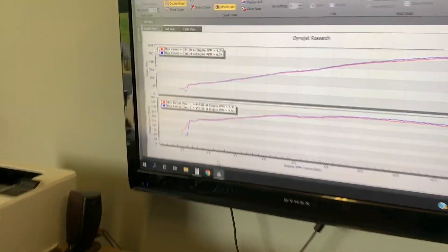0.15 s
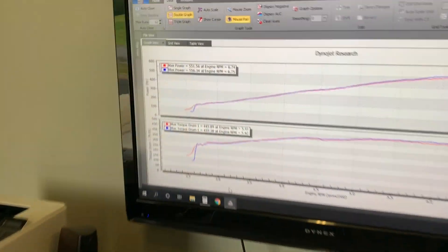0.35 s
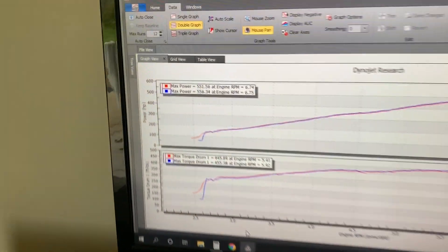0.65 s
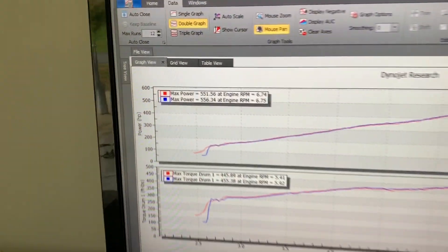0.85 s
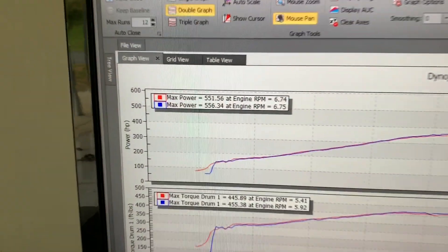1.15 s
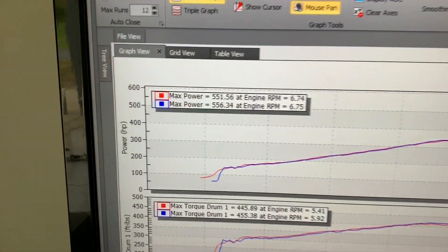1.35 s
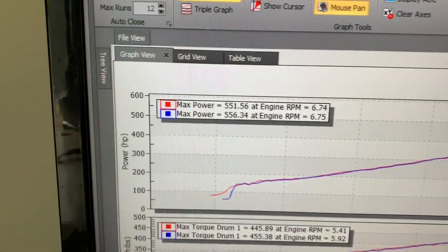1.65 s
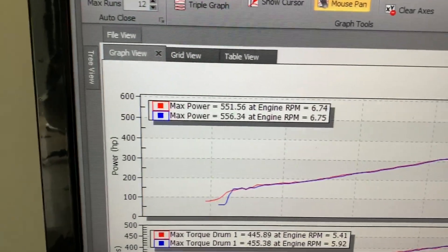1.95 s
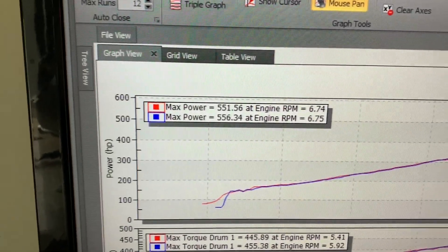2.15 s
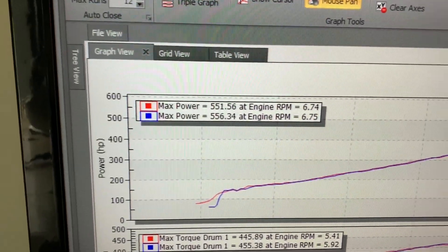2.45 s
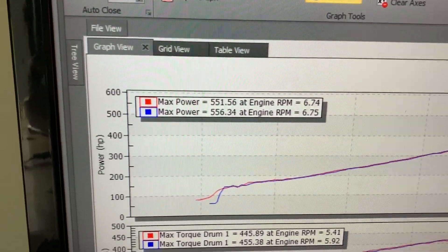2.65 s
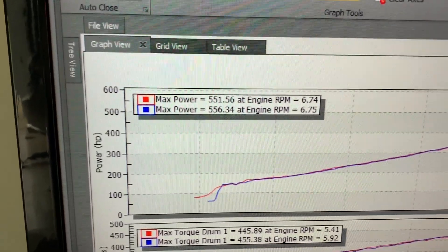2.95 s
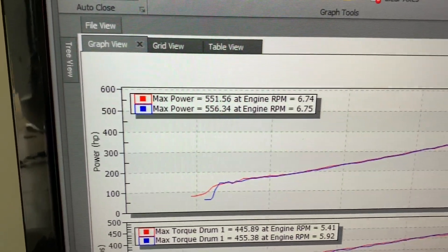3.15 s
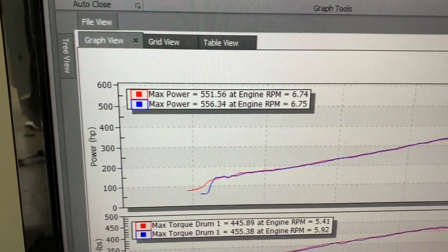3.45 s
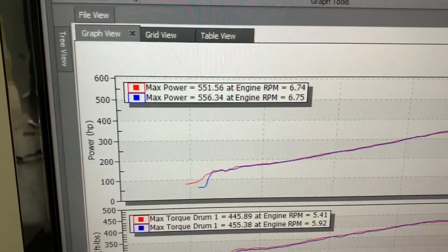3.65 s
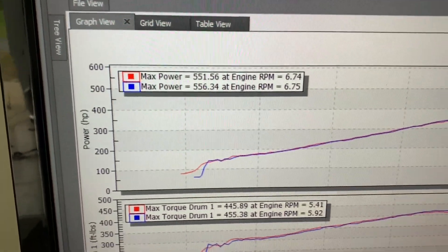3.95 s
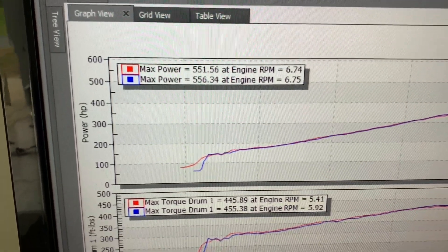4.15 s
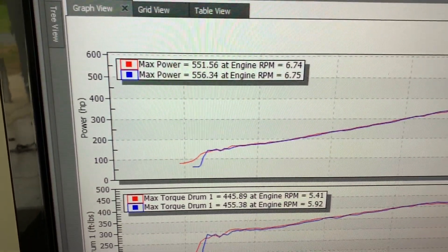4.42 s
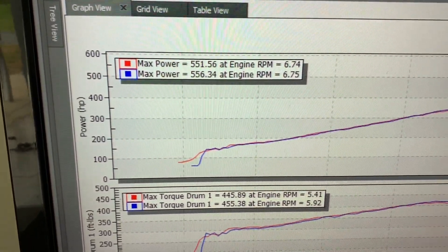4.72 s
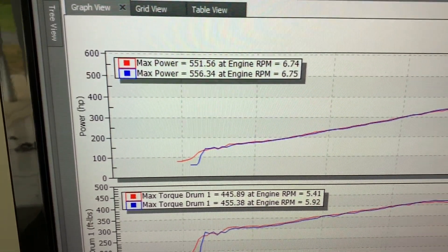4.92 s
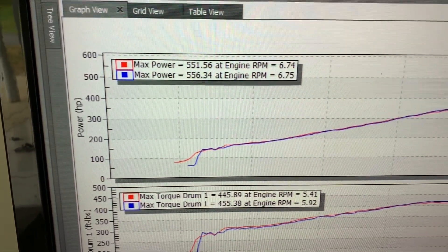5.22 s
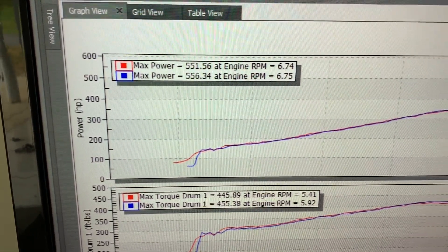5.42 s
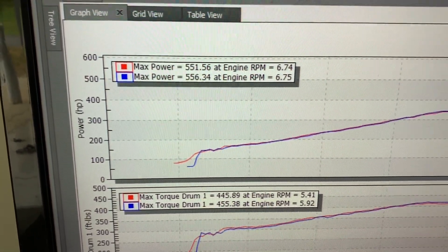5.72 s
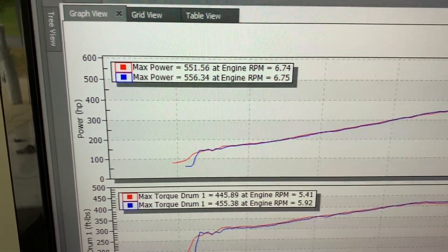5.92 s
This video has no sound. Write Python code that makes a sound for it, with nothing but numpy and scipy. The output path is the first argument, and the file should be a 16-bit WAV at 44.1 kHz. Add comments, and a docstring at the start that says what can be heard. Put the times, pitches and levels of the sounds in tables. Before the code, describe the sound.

Lumpy rasping exhaust idle grows stronger over tyre roar and a falling, fluttering whine as a rolling-road drum slows in a reverberant workshop.

```python
"""A lumpy, throbbing, rasping exhaust: a supercharged V8 idles while its wheels coast down on a dyno drum.
Firing tones, throbs and noisy puffs ring the pipes and the room; rotor whirr and valve taps lie over them.
The tyre tread hums, the axle gears and the knurled drum whine: tones and noises tied to the wheel's angle,
all sinking in pitch as the drum slows. Shaped noise makes the roar of the rolling tyres in the workshop."""
import sys
import numpy as np
from scipy import signal
from scipy.fft import rfft, irfft, next_fast_len
from scipy.io import wavfile
from scipy.ndimage import map_coordinates

SR = 44100
rng = np.random.default_rng(int(sys.argv[2]) if len(sys.argv) > 2 else 0)


def put_to_file(sound):
    """Save the sound as 16-bit audio at rate SR, in the file named by the first command-line argument."""
    columns = np.atleast_2d(sound).T  # one column per channel
    safe = np.clip(columns, -1, 1)
    whole_steps = np.round(safe * 32767)
    wavfile.write(sys.argv[1], SR, whole_steps.astype(np.int16))


N = 268128
TIME = np.arange(N) / SR
# the idle lopes: one pattern of throbs comes round every two engine cycles
LOPE_FIRINGS = 16
MAIN_THROB = 1.3  # place of the main throb in the pattern (firings)


def amp(db):
    """Decibels to gain."""
    return 10 ** (np.asarray(db) / 20)


def unit(x):
    """Scale to rms 1."""
    return x / np.sqrt(np.mean(x ** 2) + 1e-20)


def along(points, at):
    """Read (position, value) points on a log axis."""
    place, value = np.transpose(points)
    return np.interp(np.log(at + 1e-6), np.log(place), value)


def curves(rows):
    """One value per sample for each column after the time."""
    s, *cols = np.transpose(rows)
    return [np.interp(TIME, s, c) for c in cols]


def wobble(rate):
    """A smooth random curve, rate knots a second."""
    coarse = TIME[::32]
    knots = rng.standard_normal(int(N * rate / SR) + 4)
    return np.interp(TIME, coarse, map_coordinates(knots, [coarse * rate]))


def wavering_sine(cycles, waver, rate):
    """A sine along a count of cycles, its phase pushed about by a random curve (radians, knots a second)."""
    return np.sin(2 * np.pi * cycles + waver * wobble(rate))


def filtered(x, response):
    """Filter x by a complex response of frequency."""
    m = next_fast_len(N + SR // 2)
    return irfft(rfft(x, m) * response(np.fft.rfftfreq(m, 1 / SR)), m)[..., :N]


def resonances(modes, f):
    """Causal response of (centre, width, dB) modes, one row each."""
    return np.array([amp(db) * 1j * f * w / (c * c - f * f + 1j * f * w) for c, w, db in modes])


def rotating(turns, gain_by_order, size=4096):
    """Two noises tied to the wheel's angle, so that their spectrum slides with its speed."""
    m = next_fast_len(int((turns[-1] + 1) * size))  # size: points per wheel turn
    spectrum = rfft(rng.standard_normal((2, m))) * gain_by_order(np.fft.rfftfreq(m, 1 / size))
    return np.array([map_coordinates(wave, [turns * size]) for wave in irfft(spectrum, m)])


def spread(pair):
    """Two unrelated sounds become left and right, alike in the bass and the top treble."""
    # left-right likeness: (frequency [Hz], coherence [0-1])
    alike = [(60, 0.96), (130, 0.97), (250, 0.21), (500, 0.43), (1200, 0.28), (4000, 0.095), (6000, 0.1),
             (7500, 1), (15000, 1)]

    def mid_and_side(hz):
        turn = np.arccos(np.clip(along(alike, hz), -1, 1)) / 2
        return np.array([np.cos(turn), np.sin(turn)])

    mid, side = filtered(pair, mid_and_side)
    return unit(np.array([mid + side, mid - side]))


def workshop(pair):
    """The room's resonances swell whatever passes through them."""
    # pitches the workshop lifts: (centre [Hz], width [Hz], gain [dB])
    shop = [(485, 55, -7.5), (782, 25, -10), (897, 26, -9), (1000, 105, -8.5), (1440, 110, -14)]
    return spread(filtered(pair, lambda hz: 1 + resonances(shop, hz).sum(0)))


def echoes(pair, t60=0.93, wet_db=0):
    """Direct sound plus the hard walls' answer: a gliding line swells and fades as it crosses room modes."""
    t = np.arange(SR // 2) / SR
    tail = rng.standard_normal((2, len(t))) * amp(-60 * t / t60)
    tail /= np.linalg.norm(tail, axis=1, keepdims=True)
    # a mirrored lead-in lets the room ring from the first sample
    lead = np.pad(pair, ((0, 0), (len(t), 0)), mode="reflect")
    reverb = signal.fftconvolve(lead, tail, axes=1)[:, len(t):len(t) + N]
    return pair + amp(wet_db) * reverb


def patchy(pair, depth_db, width_hz=45, length_s=0.05):
    """Narrow strands of a noise swell and fade, each on its own, less so in the treble."""
    hz, t, z = signal.stft(pair, SR, nperseg=2048)
    knots = rng.standard_normal((2048, 512))
    place = np.meshgrid(hz / width_hz, t / length_s, indexing="ij")
    field = map_coordinates(knots, place, order=1, mode="wrap")
    fade = 1 / (1 + (hz / 4000) ** 2)
    gain = amp(depth_db * unit(field) * fade[:, None])
    return signal.istft(z * gain, SR, nperseg=2048)[1][:, :N]


def rolling_roar(strands_db=2.5):
    """The roar of tyres and fans is noise with swelling strands, coloured by the workshop."""
    # colour of the roar: (frequency [Hz], relative level per Hz [dB])
    colour = [(25, -40), (60, -1), (250, 2.5), (400, -5.5), (520, -2), (1100, -4.5), (1800, -3.5),
              (2800, -4.5), (4500, -9), (6300, -13.5), (9500, -9), (13000, -12.5), (15500, -19)]
    noise = patchy(rng.standard_normal((2, N)), strands_db)
    return workshop(filtered(noise, lambda hz: amp(along(colour, hz))))


def drum_hum(turns, start_db=-48, fall_db=1.5):
    """The slightly oval drum thrums in step with the wheel, sinking by fall_db a second on average."""
    hums_per_wheel_turn = 2.251
    level = amp(start_db - fall_db * TIME + 3.2 * wobble(4.17))
    hum = level * np.sqrt(2) * np.sin(2 * np.pi * hums_per_wheel_turn * turns)
    return hum * np.clip(TIME / 0.068, 0, 1)  # short fade-in


def axle_gears(turns, flutter_db=4.5, waver=0.83):
    """The axle's teeth mesh in a thin whine that comes and goes, strongest late in the coast."""
    meshes_per_turn, swell_db = 114, 1.5
    # loudness of the gear whine: (time [s], level before flutter [dB])
    gear_level = [(0, -60), (1.1, -57), (1.6, -56), (2.35, -55), (2.7, -54), (3.05, -56.5), (3.3, -53.5),
                  (3.9, -51), (4.6, -57), (4.85, -52), (5.05, -56.5), (5.5, -51.5), (6.08, -55)]
    level_db = curves(gear_level)[0] + swell_db * wobble(9)

    def ear():
        return amp(level_db + flutter_db * wobble(35)) * wavering_sine(meshes_per_turn * turns, waver, 40)

    return np.array([ear(), ear()]) * np.sqrt(2)


def whine(turns, fuzz_db=-2):
    """The knurl rubs narrow bands of hiss out of the tyres."""
    # fuzzy sidebands and hiss: (centre [wheel orders], width [wheel orders], relative level [dB])
    hiss_bands = [(143, 3, 1.5), (229, 9, -7), (242, 4, -5.5), (259, 12, -5), (282, 5, -.5), (304, 9, -10),
                  (508, 16, -8), (524, 6, -6.5), (541.5, 11, -3.5), (563, 7, 4), (586, 9, -5),
                  (553, 130, -10), (803, 12, -14), (823, 9, -14), (845.5, 11, -7.5)]

    def band(away):
        return np.exp(-np.abs(away) / 0.47) / (1 + (2 * away) ** 2)

    def gain(order):
        power = sum(amp(db) ** 2 * band((order - centre) / width) for centre, width, db in hiss_bands)
        return np.sqrt(power)

    return amp(fuzz_db) * spread(rotating(turns, gain))


def teeth(turns, waver=0.58, fade_db=4.0):
    """The knurl's ridges sing in lines that flutter as the tyres creep on the drum, and fade in and out."""
    knurl_order = 281.5  # ridges that pass in one wheel turn
    # line of the knurl, then its octave: (relative level [dB], flutter [dB])
    tones = [(-17, 5.5), (-16.5, 5.5)]

    def line(order, flutter_db):
        level = amp(flutter_db * wobble(55) + fade_db * wobble(11))
        return unit(level * wavering_sine(order * turns, waver, 70))

    def ear():
        return sum(amp(db) * line(k * knurl_order, flutter_db) for k, (db, flutter_db) in enumerate(tones, 1))

    pair = np.array([ear(), ear()])
    return pair.std() * spread(pair)


def tread_note(turns, flutter_db=4.5, waver=0.81):
    """The commonest block length of the tread sings one wavering note that sinks with the wheel."""
    blocks_per_turn = 39.1
    # the note comes and goes: (time [s], level before flutter [dB])
    note_level = [(0, -46), (.45, -47), (.8, -52), (1.25, -49), (2, -46), (2.25, -55), (2.55, -51),
                  (3, -56), (3.75, -49), (4.3, -62), (6.08, -64)]
    level_db, = curves(note_level)
    level = amp(level_db + flutter_db * wobble(22.1))
    return np.sqrt(2) * level * wavering_sine(blocks_per_turn * turns, waver, 28)


def tread(turns, scatter_db=1.8, blur_from_s=3.46, blur_over_s=1.3, blur_share=0.41):
    """The tread pattern repeats every turn: a comb of wheel orders that later blurs partly into a rumble."""
    line_width = .18  # sets how narrow the comb lines are
    # blocks of mixed lengths spread the hum: (wheel order, relative level [dB])
    hum_shape = [(12, -17), (20, -9.5), (30, -4.5), (35.5, -8), (39.3, 5.5), (45, -3), (48.5, 0), (57, 1.5),
                 (62, -2), (67, -10.5), (79, 3.5), (92, -6), (101, 0), (107, -8.5), (122, -7), (143, -8.5),
                 (200, -10), (300, -22)]
    # comb lines of set strength, the others are random: (wheel order, line gain [dB])
    peaks = [(39, -3), (40, 0), (41, 1), (43, 3), (48, 3), (49, 4), (52, 4), (54, 3), (57, 2), (78, 3),
             (82, 2), (86, 4), (99, 4), (110, 3)]
    strength_db = scatter_db * rng.standard_normal(2049)
    for order, db in peaks:
        strength_db[round(order)] = db

    def shape(order):
        return amp(along(hum_shape, order))

    def comb(order):
        strength = amp(strength_db)[np.rint(order).astype(int)]
        return strength / (1 + (np.sin(np.pi * order) / line_width) ** 2)

    lines = unit(rotating(turns, lambda order: shape(order) * comb(order)))
    rumble = unit(rotating(turns, shape, size=1024))
    blur = blur_share * np.clip((TIME - blur_from_s) / blur_over_s, 0, 1)
    return workshop(np.sqrt(1 - blur) * echoes(lines) + np.sqrt(blur) * rumble)


def dyno(turns):
    """Wheels and drum roll together: roar, tread hum, whine and drum thrum."""
    # rolling loudness: (time [s], roar level [dB], tread hum level [dB], whine gain [dB])
    rolling_levels = [(0, -43, -39.5, -47.5), (1, -41, -40, -44.5), (2, -43, -39, -42.5),
                      (3, -41.5, -39, -42.5), (4, -39.5, -38.5, -41), (5, -38.5, -38, -41),
                      (6.08, -37, -38, -40)]
    roar_db, tread_db, whine_db = curves(rolling_levels)
    roar = amp(roar_db) * rolling_roar()
    hum = amp(tread_db) * tread(turns) + tread_note(turns)
    singing = amp(whine_db + 0.77 * wobble(9)) * (whine(turns) + teeth(turns))
    return roar + hum + singing + drum_hum(turns)


def valve_clatter(cycles, clatter_db=-50, centre_hz=1750, width_hz=900, uneven_db=3.0, decay=4.7):
    """Valves tap twice a firing; each tap is a short rattle of uneven strength."""
    tap, since = np.divmod(2 * cycles, 1)
    size = amp(uneven_db * rng.standard_normal(int(tap[-1]) + 1))[tap.astype(int)]
    taps = size * np.exp(-decay * since) * rng.standard_normal((2, N))
    mode = [(centre_hz, width_hz, 0)]
    return amp(clatter_db) * unit(filtered(taps, lambda hz: resonances(mode, hz)[0] ** 2))


def supercharger(cycles, decay=1.03):
    """The belt-driven rotors whirr in rough lines that follow the engine speed and rattle at each firing."""
    waver, flutter_db = 1.1, 3.5
    # lines of the whirr: (multiple of the firing rate, relative level [dB])
    rotor_lines = [(20.2, 2.5), (25, 1.5), (26.4, -0.5)]
    # the whirr fades as the engine settles: (time [s], level [dB])
    whirr_level = [(0, -48), (.8, -46), (1.6, -57.5), (6.08, -64)]
    level_db, = curves(whirr_level)
    rattle = np.exp(-decay * (cycles % 1))

    def line(order):
        return unit(rattle * amp(flutter_db * wobble(70)) * wavering_sine(order * cycles, waver, 70))

    def ear():
        return sum(amp(db) * line(order) for order, db in rotor_lines)

    return amp(level_db) * spread(np.array([ear(), ear()]))


def settling_drone(drone_hz=171, drone_db=-44, fade_s=1.0):
    """A wavering drone that dies away as the engine settles to idle."""
    level = amp(drone_db + 1.6 * wobble(7.24)) * np.exp(-(TIME / fade_s) ** 4)
    return level * np.sqrt(2) * wavering_sine(drone_hz * TIME, 0.93, 13.5)


def pipe_drone(cycles, flutter_db=1.5, waver=0.4):
    """The uneven firing of each bank sets a pipe droning between two harmonics."""
    order = 3.5  # multiple of the firing rate
    # loudness of the drone: (time [s], level before flutter [dB])
    drone_level = [(0, -54), (.6, -59), (1, -46.5), (1.3, -55.5), (2, -60), (2.3, -55), (3, -57.5),
                   (3.33, -47.5), (3.55, -61), (4.2, -52.5), (5.6, -51.5), (5.72, -40.5), (5.87, -42),
                   (6.08, -57)]
    level_db, = curves(drone_level)
    level = amp(level_db + flutter_db * wobble(16))
    return np.sqrt(2) * level * wavering_sine(order * cycles, waver, 14)


def throbs(cycles, join_s=0.41, scatter_db=1.0):
    """(s, dB) of every throb: the main one once in each round of the lope, lesser ones join in by and by."""
    # the lope builds up, then evens out: (time [s], main throb level before scatter [dB])
    lope = [(.3, -40), (1.2, -31.5), (2.3, -26.5), (3.95, -21.5), (4.4, -24), (6.08, -31)]
    # throbs that fill the pattern: (place [firings], level before scatter [dB], joins in at [s])
    lesser_throbs = [(4.5, -26, 3.15), (9, -28, 3.36), (13.9, -29, 1.74)]
    rounds = np.arange(0, cycles[-1], LOPE_FIRINGS)

    def times(place):
        firings = rounds + place
        return np.interp(firings[firings < cycles[-1]], cycles, TIME)

    both = [(s, np.interp(s, *np.transpose(lope))) for s in times(MAIN_THROB)]
    for place, db, joins in lesser_throbs:
        both += [(s, db - 20 * np.log10(1 + np.exp((joins - s) / join_s))) for s in times(place)]
    return [(s, db + scatter_db * rng.standard_normal()) for s, db in both]


def exhaust_kicks(cycles, kick_db=-6, kick_s=0.0018):
    """Every throb opens with one hard firing: a short, sharp kick of pressure."""
    kicks = np.zeros(N)
    for s, db in throbs(cycles):
        # a trough of the firing tone close to the throb's peak
        start = np.interp(np.round(np.interp(s, TIME, cycles)) - .5, cycles, TIME)
        near = slice(max(int(start * SR) - SR // 20, 0), int(start * SR) + SR // 20)
        u = (TIME[near] - start) / kick_s
        kicks[near] -= amp(db + kick_db) * (1 - u ** 2) * np.exp(-.5 * u ** 2)
    return kicks


def exhaust_rasp(cycles, uneven_db=3.5, jitter_s=0.00014, lope_db=0.5, decay=2.1):
    """Each firing cracks and spits gas into the pipes' upper resonances, on average hardest at the main throb."""
    gas_share = .3  # of the power
    # upper resonances of the pipes: (centre [Hz], width [Hz], relative gain [dB])
    pipe_modes = [(234, 45, 1.5), (294, 19, -2.5), (343, 36, -6.5), (475, 34, -5), (518.6, 16.5, 4.5),
                  (568, 33, -2.5), (662, 43, -4.5), (794, 29, -2), (1070, 19, -6.5), (1155, 33, -6.5),
                  (1377, 63, -2.5), (1522, 54, -5.5), (1940, 50, -19), (2180, 110, -6)]
    # the rasp grows as the idle hardens: (time [s], level [dB])
    rasp_level = [(0, -56), (.6, -52.5), (1, -48.5), (1.5, -54.5), (3.2, -50), (4, -44.5), (4.8, -44.5),
                  (5.2, -52), (5.75, -42.5), (6.08, -42.5)]
    rasp_db, = curves(rasp_level)
    firing, since = np.divmod(cycles, 1)
    number = np.arange(int(firing[-1]) + 1)
    chance = rng.standard_normal((len(number), 3))
    lope_swing = np.cos(2 * np.pi * (number - MAIN_THROB) / LOPE_FIRINGS)
    size = amp(uneven_db * chance[:, 0] + lope_db * lope_swing)
    times = np.interp(number, cycles, TIME) + jitter_s * chance[:, 1:].T
    cracks = np.array([np.bincount(np.clip(s * SR, 0, N - 1).astype(int), size, N) for s in times])
    gas = size[firing.astype(int)] * np.exp(-decay * since) * rng.standard_normal((2, N))
    bursts = np.sqrt(1 - gas_share) * unit(cracks) + np.sqrt(gas_share) * unit(gas)
    signs = (-1) ** np.arange(len(pipe_modes))  # neighbouring modes ring in opposite phase
    rung = filtered(bursts, lambda hz: signs @ resonances(pipe_modes, hz) / (1 + (hz / 2600) ** 4))
    return amp(rasp_db) * spread(rung * [[1], [-1]])


def exhaust_burble(cycles, body_db, scatter_s=0.0019, uneven=0.59, burble_db=1.5):
    """One puff per firing, uneven in size and timing, rings the pipes and the room."""
    # pipe and room resonances: (centre [Hz], width [Hz], relative gain [dB])
    boom_modes = [(73.3, 6.6, 0.5), (83.9, 4.95, 8.5), (110, 20.2, -1.5), (127.7, 13.5, -1),
                  (140.9, 9.3, -2), (179, 25.5, -6), (228, 16, -14), (288.5, 13.7, -12.5), (349, 26, -18)]
    firings = np.interp(np.arange(1, int(cycles[-1])), cycles, TIME)
    chance = rng.standard_normal((len(firings), 4))
    puffs = np.zeros((2, N))
    for path in range(2):
        at = np.clip((firings + scatter_s * chance[:, path]) * SR, 0, N - 1).astype(int)
        puffs[path, at] = 1 + uneven * chance[:, 2 + path]
    signs = (-1) ** np.arange(len(boom_modes))  # neighbouring modes ring in opposite phase

    def ring(hz):
        low_cut = 1 - np.exp(-(hz / 47) ** 6)
        return signs @ resonances(boom_modes, hz) * low_cut

    return amp(body_db + burble_db) * spread(filtered(puffs, ring))


def exhaust_octave(cycles, room_hz=129, room_width_hz=14):
    """The octave of the firing wavers, and carries best while it lies near a room mode."""
    flicker_db = 2.5
    # drive of the octave: (time [s], level before flicker and room [dB])
    octave_level = [(0, -42), (.75, -51), (1.2, -40), (1.6, -37.5), (2.3, -41.5), (3.3, -39), (4.5, -37),
                    (6.08, -35.5)]
    level = amp(curves(octave_level)[0] + flicker_db * wobble(14))
    octave = level * np.sqrt(2) * np.cos(2 * np.pi * 2 * cycles + .5 * wobble(10))
    return filtered(octave, lambda hz: resonances([(room_hz, room_width_hz, 0)], hz)[0])


def exhaust_tone(cycles, tone_db, steady_db=-5.0, throb_hz=76, throb_s=0.013):
    """The firing tone; each throb is a short swell of the room's boom, in step with the firing."""
    tone = np.sqrt(2) * amp(tone_db + steady_db) * np.cos(2 * np.pi * cycles)
    for s, db in throbs(cycles):
        at = min(round(s * SR), N - 1)
        near = slice(max(at - SR // 10, 0), at + SR // 10)
        t = TIME[near] - s
        swell = amp(db) * np.exp(-.5 * (t / throb_s) ** 2)
        tone[near] += swell * np.cos(2 * np.pi * (cycles[at] + throb_hz * t))
    return tone


def engine():
    """The idling V8, eight firings to a cycle: exhaust, stronger on the right, and noise from under the bonnet."""
    # idle speed: (time [s], firing rate [Hz])
    idle = [(0, 71.3), (.25, 69.7), (.7, 63.6), (1.5, 62.8), (2.4, 65.2), (3.4, 64.6), (3.8, 66.6),
            (4.6, 66.6), (5, 65.4), (5.5, 65.7), (6.08, 64)]
    # exhaust loudness before trims: (time [s], firing tone level [dB], burble level [dB])
    exhaust_levels = [(.2, -30, -41), (.8, -40, -41), (1.5, -37, -39), (2.3, -35, -38.5), (3.3, -33, -38),
                      (4.5, -29.5, -34), (5, -31, -34), (5.6, -25, -33), (6.08, -29, -31.5)]
    firing_hz, = curves(idle)
    tone_db, body_db = curves(exhaust_levels)
    cycles = np.cumsum(firing_hz) / SR  # firings so far
    tone = exhaust_tone(cycles, tone_db)
    body = exhaust_octave(cycles) + exhaust_burble(cycles, body_db) + exhaust_rasp(cycles)
    body = body + exhaust_kicks(cycles) + pipe_drone(cycles) + settling_drone()
    exhaust = tone * amp([[-.65], [.65]]) + body * amp([[-1.4], [1.4]])  # left, right trims in dB
    return exhaust + supercharger(cycles) + valve_clatter(cycles)


def scene():
    """Engine and dyno; the dyno's lower sound leads on the left, its treble leads on the right."""
    low_lead_s, treble_lag_s, split_hz = .00038, .000216, 2200
    # coasting: (time [s], wheel speed [turns/s])
    wheel = [(0, 23.163), (1, 21.35), (2, 19.648), (3, 18.027), (4, 16.459), (5, 14.916), (6.08, 13.246)]
    turns = np.cumsum(curves(wheel)[0]) / SR

    def ear_delays(hz):
        lag = np.where(hz < split_hz, -low_lead_s, treble_lag_s)  # left behind right, half to each ear
        return np.exp(1j * np.pi * hz * lag * np.array([[-1], [1]]))

    return filtered(dyno(turns), ear_delays) + axle_gears(turns) + engine()


def record(dry, low_cut_hz=37):
    """Cut the deepest bass and everything above the band limit."""
    top_hz = 15750
    return filtered(dry, lambda hz: (1 - np.exp(-(hz / low_cut_hz) ** 4)) * (hz < top_hz))


dry = scene()
out = record(dry)
put_to_file(out)
```